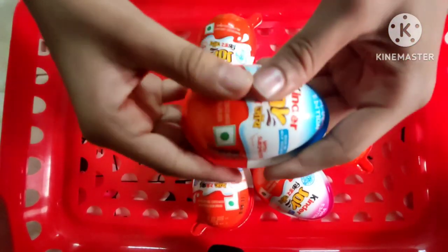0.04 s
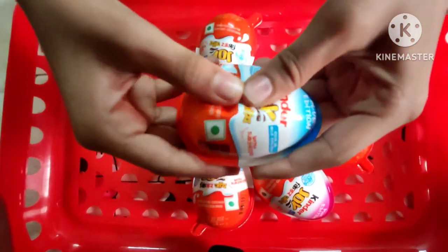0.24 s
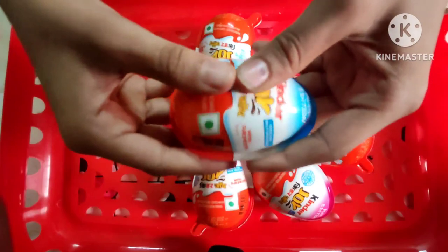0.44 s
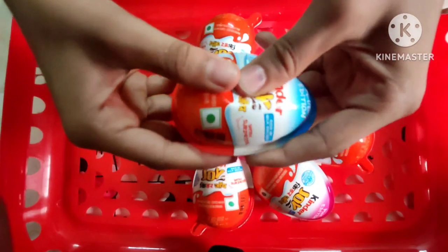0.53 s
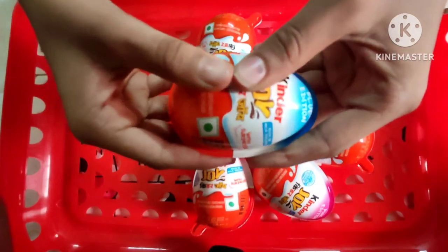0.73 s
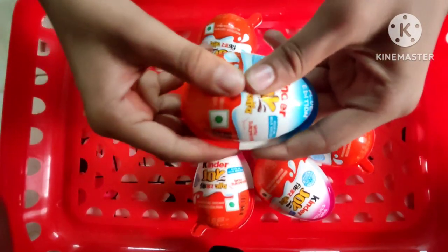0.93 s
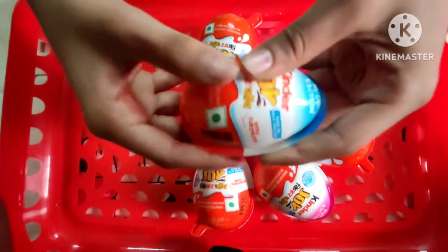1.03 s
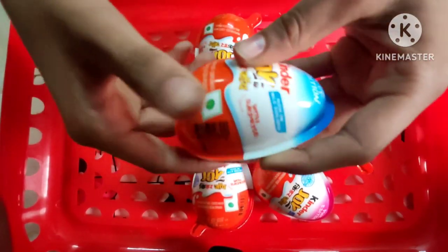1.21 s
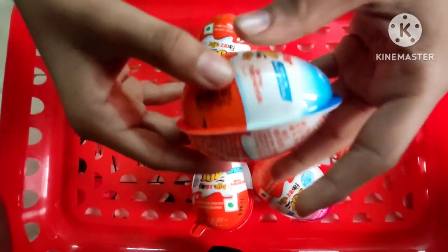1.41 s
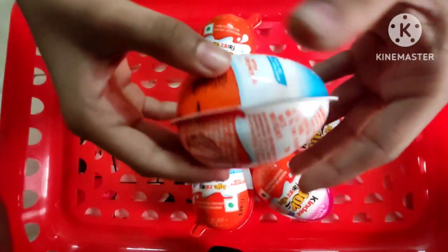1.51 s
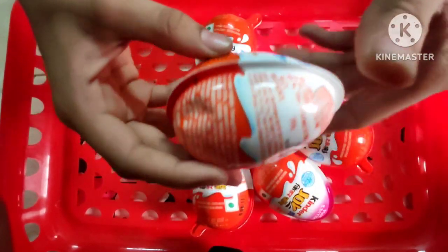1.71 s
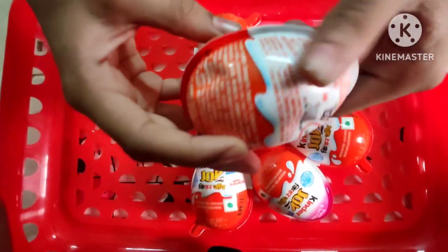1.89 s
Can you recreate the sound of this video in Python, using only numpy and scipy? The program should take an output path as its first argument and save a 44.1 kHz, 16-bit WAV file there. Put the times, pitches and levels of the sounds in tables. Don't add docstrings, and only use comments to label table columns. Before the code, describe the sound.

Fingers handle a thin plastic egg: sharp hollow knocks, small ticks, then faint rubs and quiet

```python
import sys
import numpy as np
from scipy import signal
from scipy.fft import rfft, irfft, next_fast_len
from scipy.io import wavfile
from scipy.ndimage import uniform_filter1d

SR = 44100
rng = np.random.default_rng(int(sys.argv[2]) if len(sys.argv) > 2 else 0)


def waveform_to_disk(signal):
    frames = np.transpose(np.atleast_2d(signal))
    scaled = np.clip(frames, -1, 1) * 32767
    samples = np.round(scaled).astype(np.int16)
    wavfile.write(sys.argv[1], SR, samples)


def undo_db(level):
    steps = np.asarray(level, float) / 20
    return 10 ** steps


N = 85995
T = np.arange(1400) / SR
ECHO_S, ECHO_DB = 0.0031, -12.5


def unit(x):
    return x / np.sqrt(np.mean(x ** 2) + 1e-20)


def along(points, hz):
    f, v = np.transpose(points)
    return np.interp(np.log(hz + 1), np.log(f + 1), v)


def filtered(x, response):
    m = next_fast_len(len(x) + SR // 4)
    spectrum = rfft(x, m) * response(np.fft.rfftfreq(m, 1 / SR))
    return irfft(spectrum, m)[:len(x)]


def later(sound, s):
    return filtered(sound, lambda f: np.exp(-2j * np.pi * f * s))


def add(track, s, sound):
    at = round(s * SR)
    track[..., at:at + sound.shape[-1]] += sound[..., :max(N - at, 0)]


def knocks():
    # t/s, peak level/dB, hardness/(dB per octave), hollow thump/dB, rebound/dB
    blows = [
        (0.2471, -36, -22, -23, -2),
        (0.4171, -11.5, -3, -0.5, -23),
        (0.4451, -13.5, -4, 0, 3),
        (0.6125, -40, -8, -18, -2),
        (0.747, -24.5, -7, 3.5, 8),
        (0.7757, -12, -0.5, 3.5, 0),
        (0.9365, -26, -2, 9.5, -4),
        (1.1071, -17.5, -12, 1.5, 4.5),
        (1.1272, -12, 2, -1.5, 5),
    ]
    # level/dB near 1000, 1500, 3000 and 4100 Hz
    spots = [(0, 0, -4, 0), (9, -4.5, -11, 1), (8, -7, 13.5, -25), (3, -3, 1, 3), (-9, -5, 5, 1),
             (11, 11, 5, 11), (9, 7, 0, -8), (-4, -1, -15, -8), (-15, -25, 16, 0.5)]
    spot_hz = [1000, 1500, 2200, 3000, 4100, 5500]
    # f/Hz, level/dB, t60/s
    shell = [(1040, -14, 0.027), (1558, 10, 0.014), (2224, 11, 0.015), (2650, 5, 0.0057),
             (3460, -9.5, 0.013), (4040, 1, 0.013), (5200, -3, 0.0073), (5580, 5.5, 0.013),
             (6530, -2.5, 0.0043), (8800, -2.5, 0.00067), (11000, -14.5, 0.014)]
    rise_s, rebound_s = 0.00031, 0.00091
    hollow_hz, hollow_t60, hollow_rise_s = 278, 0.007, 0.000077

    out = np.zeros((2, N))
    hz, level, t60 = np.transpose(shell)
    thump = push(hollow_hz, hollow_t60, hollow_rise_s)
    for (s, db, hard_db, thump_db, rebound_db), (low, second, mid, high) in zip(blows, spots):
        favoured = level + np.interp(hz, spot_hz, [low, second, 0, mid, high, 0])
        blow = ring(np.transpose([hz, favoured, t60]), hard_db, 238, rise_s)
        blow = blow + undo_db(rebound_db) * later(blow, rebound_s)
        blow = blow + undo_db(ECHO_DB) * later(blow, ECHO_S)
        add(out, s, undo_db(db - 0.5) * radiated(blow))
        add(out, s, undo_db(db + thump_db) * thump)
    return out


def ring(modes, slope_db, low_hz, rise_s):
    spread_db, spread_hz = 1.5, 0.015
    longest_t60 = 0.0085
    crack_db, crack_t60 = 2, 0.005
    click_db, click_s = 5, 0.00006

    hz, db, t60 = np.transpose(modes)[:, :, None]
    db = db + slope_db * np.log2(np.maximum(hz, 2000) / 4000)
    luck = rng.standard_normal((2, len(modes), 1))
    decay = undo_db(db + spread_db * luck[0] - 60 * T / np.minimum(t60, longest_t60))
    tones = decay * np.sin(2 * np.pi * hz * (1 + spread_hz * luck[1]) * T)

    def crack_colour(f):
        above_top = np.maximum(f - hz.max(), 0) / 1000
        return undo_db(np.interp(f, hz[:, 0], db[:, 0], -40) - 4.0 * above_top)

    crack = filtered(rng.standard_normal(len(T)), crack_colour)
    crack = undo_db(crack_db - 60 * T / crack_t60) * crack
    click = undo_db(click_db + db.max()) * np.exp(-(T / click_s - 2) ** 2)
    sound = (crack - tones.sum(axis=0)) * (1 - np.exp(-T / rise_s)) - click
    sound = filtered(sound, lambda f: (-f * f / (low_hz ** 2 - f * f + 1.4j * f * low_hz)) ** 2)
    return sound / abs(sound).max()


def push(hz, t60, rise_s):
    return -undo_db(-60 * T / t60) * (1 - np.exp(-T / rise_s)) * np.sin(2 * np.pi * hz * T)


def radiated(sound):
    blur_hz = 1200
    bins = max(round(blur_hz * len(sound) / SR), 1)
    power = uniform_filter1d(abs(rfft(sound)) ** 2, size=bins)
    pulse = irfft(np.sqrt(abs(power)), len(sound))
    return np.array([sound, np.roll(pulse, shift=80)])


def ticks():
    # t/s, peak level/dB, lowest ringing f/Hz, slope/(dB per octave)
    snaps = [(0.1002, -57, 6500, 10), (.1095, -41, 4500, 1), (.7532, -35, 3000, 1),
             (0.2588, -32, 1200, -10.5), (0.2717, -39, 1000, -11), (0.2835, -18.5, 840, 1.5),
             (0.3215, -35.5, 1200, -13), (.378, -26.5, 2400, -9.5), (0.3882, -36, 2520, -6),
             (0.3972, -35, 1510, -4), (.402, -22, 1470, -0.5), (.411, -25, 1500, 3.5),
             (0.6285, -29, 710, -3), (0.7638, -23, 4320, -8.5), (0.773, -45, 3000, -6),
             (0.9716, -40, 1500, -23), (0.98, -48, 1500, -10), (1.0127, -25.5, 1000, -1),
             (1.0916, -31.5, 1500, -12), (1.1012, -21, 4240, -3.5), (1.149, -32, 2510, -3.5),
             (1.427, -52, 1500, -14), (1.4347, -57, 2470, 3), (1.4744, -48, 1770, -15),
             (1.5311, -46.5, 1000, -12), (1.589, -55, 2500, -15), (1.837, -56, 1200, -6),
             (1.941, -49, 1200, -18), (1.632, -57, 1500, -14), (1.735, -55, 2050, -7),
             (1.9171, -48.5, 2020, 4)]
    # f/Hz, level/dB, t60/s
    seam = [(1110, -11, 0.01), (1900, -1, 0.0068), (2400, -5.5, 0.0031), (3000, 3, 0.018),
            (3870, 8.5, 0.0084), (4320, -16, 0.0015), (5015, 5.5, 0.013), (6010, 5.5, 0.011),
            (6820, -2, 0.013), (8250, 1.5, 0.0074), (9480, -2, 0.012), (10370, -2, 0.0051),
            (11800, -50, .005), (13900, -18, 0.0071)]
    # t/s, peak level/dB, f/Hz
    specks = [(.1098, -52, 4500), (0.111, -42, 7140), (.112, -37, 4180), (0.1116, -40, 6200),
              (0.116, -39, 6950), (.1192, -49, 7300), (0.1207, -39, 4140), (.1236, -34.5, 5180),
              (0.125, -48.5, 9670), (0.1288, -29, 4560), (.1315, -43, 4300), (.133, -45, 7640),
              (0.136, -54, 4900), (1.446, -44, 1830), (1.457, -42.5, 1900), (1.49, -54, 4340),
              (1.508, -60, 4170), (1.567, -57, 4270), (1.574, -56, 7000), (1.574, -61, 5100),
              (1.411, -55, 3300), (1.381, -60, 4300), (1.397, -46, 3440), (1.397, -60, 5700),
              (1.435, -49, 3720), (1.4472, -43.5, 4220), (1.458, -50, 4400), (1.476, -52, 4000),
              (1.498, -49, 4200), (1.497, -56.5, 6500), (1.585, -50, 3020), (1.58, -58, 7200),
              (1.802, -51, 3400), (0.6177, -28, 1090), (.004, -48.5, 3130)]
    snap_rise_s, speck_peak_s = 0.00023, 0.0009

    out = np.zeros((2, N))
    for s, db, low_hz, slope_db in snaps:
        snap = ring(seam, slope_db, 0.78 * low_hz, snap_rise_s)
        snap = snap + undo_db(ECHO_DB - 2.5) * later(snap, ECHO_S)
        add(out, s, undo_db(db) * radiated(snap))
    u = T / speck_peak_s
    swell = (u * np.exp(1 - u)) ** 2
    for s, db, hz in specks:
        add(out, s, undo_db(db - 7) * swell * np.sin(2 * np.pi * hz * T))
    return out


def pads():
    # t/s, peak level/dB, way (1 pushing in, -1 letting go)
    thuds = [
        (0.2223, -40.5, -1),
        (0.2457, -32, -1),
        (0.5873, -38.5, 1),
        (0.6161, -35, -1),
        (0.9665, -30.5, 1),
        (0.976, -40.5, -1),
    ]
    # start t/s, length/s, level/dB, lowest f/Hz
    rubs = [
        (0.092, 0.047, -58.5, 1610),
        (0.11, 0.029, -54, 4100),
        (0.222, 0.053, -61, 1510),
        (0.601, 0.031, -57, 1960),
        (0.953, 0.011, -64, 1486),
        (1.377, 0.022, -67, 2430),
        (1.43, 0.04, -66.5, 2430),
        (1.467, 0.058, -72, 3000),
        (1.561, 0.025, -69, 3000),
        (1.787, 0.05, -68.5, 1500),
    ]
    # f/Hz, level/dB
    rub_colour = [(1000, 25), (2200, 13), (4500, 3.5), (7000, -2), (10000, -12), (15000, -26)]
    pad_hz, pad_t60, pad_rise_s = 222, 0.027, 0.00042
    grains_per_s, grain_db = 9000, 2.2

    out = np.zeros(N)
    for s, db, way in thuds:
        add(out, s, np.sign(way) * undo_db(db + 6.5) * push(pad_hz, pad_t60, pad_rise_s))
    for s, length, db, low_hz in rubs:
        luck = rng.random((3, SR // 10))
        happens = luck[0] < grains_per_s / SR
        grains = happens * undo_db(-grain_db * np.log(luck[1] + 1e-9)) * (luck[2] - 0.5)
        grains = filtered(grains, lambda f: undo_db(along(rub_colour, f)) / np.sqrt(1 + (low_hz / (f + 1)) ** 20))
        u = np.arange(SR // 10) / SR / length
        stroke = np.clip(4 * u, 0, 1) * np.clip(5 * (1 - u), 0, 1)
        add(out, s, undo_db(db) * unit(grains) * stroke)
    return out


def room(x):
    # f/Hz, t60/s
    decay = [(200, 0.35), (1000, 0.35), (2200, 0.35), (5000, 0.33), (10000, 0.17)]
    # f/Hz, level/dB
    tail_colour = [(200, -4.5), (700, -4), (1500, 2), (3000, -8.5), (7000, -10), (12000, 1)]
    gap_s, rise_s = 0.0031, 0.0036

    out, step = np.zeros(N), SR // 40
    for at in range(0, N, step):
        hz, t, z = signal.stft(rng.standard_normal(SR // 3), SR, nperseg=128)
        fall_db = along(tail_colour, hz)[:, None] - 60 * t / along(decay, hz)[:, None]
        shape = undo_db(fall_db) * (1 - np.exp(-t / rise_s))
        tail = signal.istft(z * shape, SR, nperseg=128)[1]
        tail = tail / np.linalg.norm(tail)
        add(out, at / SR + gap_s, signal.fftconvolve(x[at:at + step], tail))
    return out


def whistle():
    # t/s, f/Hz, level/dB
    course = [
        (0, 3400, -87),
        (0.022, 3400, -64.5),
        (.05, 3400, -70.5),
        (.085, 3390, -78),
        (.15, 3390, -74),
        (0.202, 3380, -79),
        (.25, 3380, -86),
    ]
    s, hz, db = np.transpose(course)
    t = np.arange(N) / SR
    phase = 2 * np.pi * np.cumsum(np.interp(t, s, hz)) / SR
    return np.sqrt(2) * undo_db(np.interp(t, s, db, right=-120)) * np.sin(phase)


def background():
    # f/Hz, level/(dB per Hz)
    air_colour = [(35, 1), (60, -1.5), (124, -7), (371, -1), (968, -9), (1510, -16.5), (2840, -27),
                  (3420, -31), (16000, -41)]
    # f/Hz, level/(dB per Hz)
    rumble_colour = [(3, -22), (10, 11), (25, -22.5), (50, -6), (90, -50)]
    # f/Hz, level/dB, width/Hz
    hums = [(131, -64, 9.6), (234, -56.5, 75), (284, -57.5, 49), (384, -56, 150)]
    air_db, rumble_db = -53, -50

    z = signal.stft(rng.standard_normal(N), nperseg=512)[2]
    patches = uniform_filter1d(rng.standard_normal(z.shape), 6, 0)
    patches = uniform_filter1d(patches, 10, 1)
    patchy = signal.istft(z * undo_db(1.5 * unit(patches)), nperseg=512)[1][:N]
    air = undo_db(air_db) * unit(filtered(patchy, lambda f: undo_db(along(air_colour, f))))

    rumble = filtered(rng.standard_normal(N), lambda f: undo_db(along(rumble_colour, f)) * (f > 2) * (f < 100))
    rumble = undo_db(rumble_db) * unit(rumble)

    hum = np.zeros(N)
    for hz, db, width in hums:
        band = filtered(rng.standard_normal(N), lambda f: 1 / (1 + ((f - hz) / width) ** 2))
        hum += undo_db(db) * unit(band)
    return air + rumble + hum


def microphone(x):
    low_hz, top_hz = 140, 11500
    return filtered(x, lambda f: (1j * f / (low_hz + 1j * f)) ** 2 / (1 + 1j * f / top_hz))


def scene():
    room_db = -10
    hits = knocks() + ticks()
    skin = pads()
    near, walls = [microphone(x) for x in hits]
    reverb = undo_db(room_db) * room(walls + undo_db(-1) * skin)
    return (near + skin + reverb + whistle() + background())[None]


def band_limit(x):
    return signal.sosfilt(signal.butter(12, 16200, fs=SR, output="sos"), x)


def record(dry):
    return band_limit(dry)


dry = scene()
out = record(dry)
waveform_to_disk(out)
```